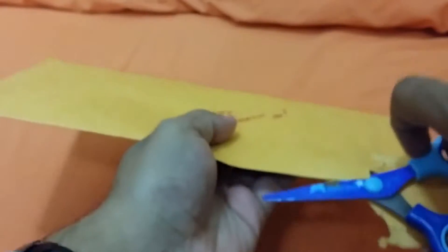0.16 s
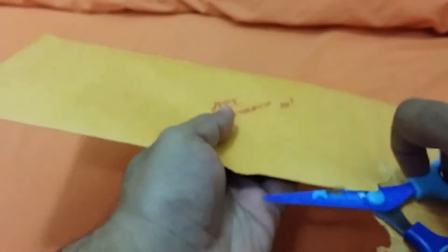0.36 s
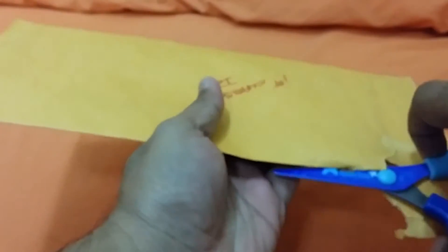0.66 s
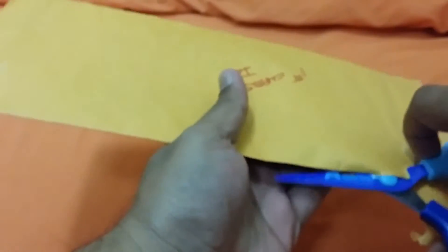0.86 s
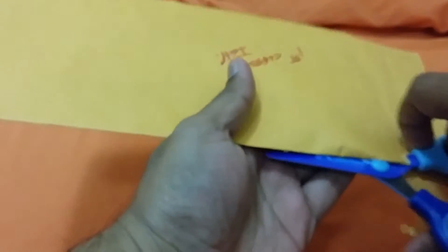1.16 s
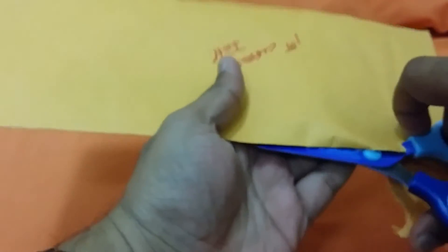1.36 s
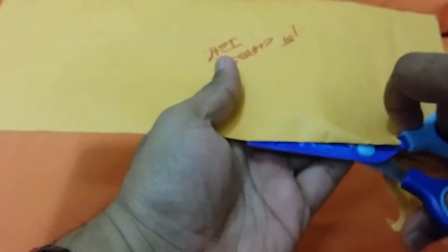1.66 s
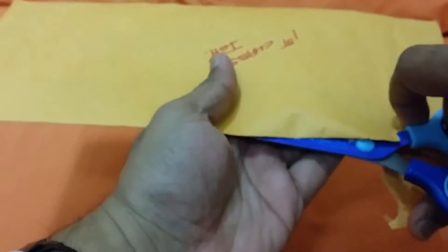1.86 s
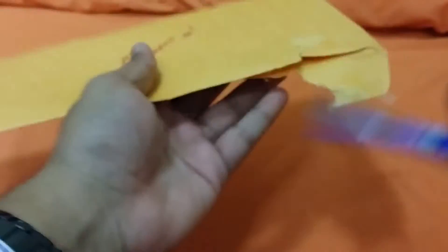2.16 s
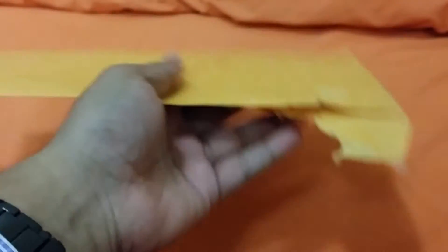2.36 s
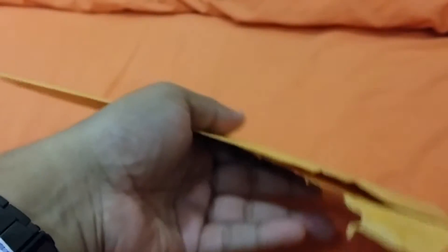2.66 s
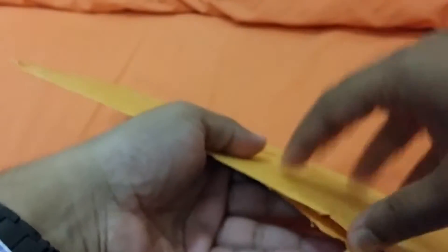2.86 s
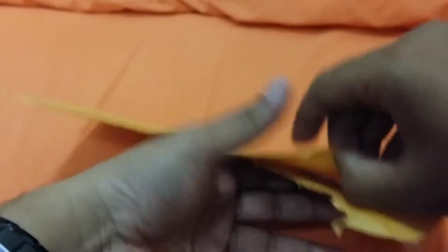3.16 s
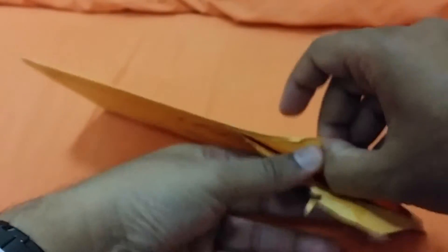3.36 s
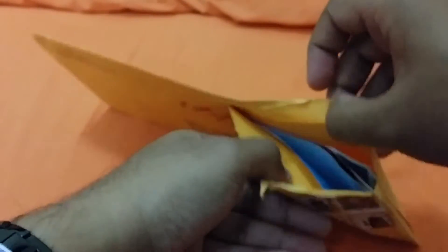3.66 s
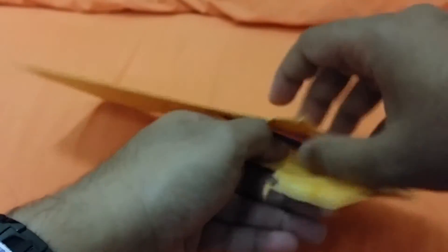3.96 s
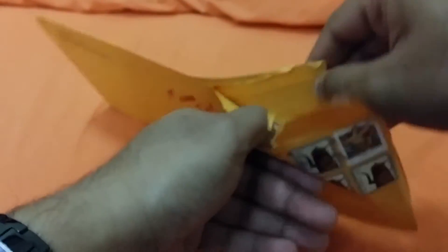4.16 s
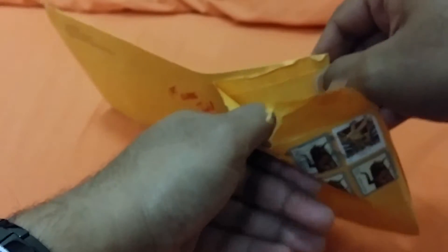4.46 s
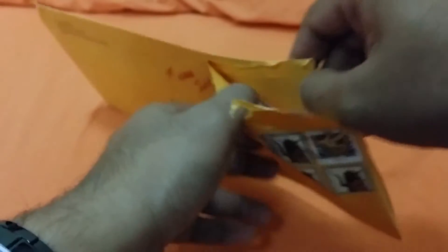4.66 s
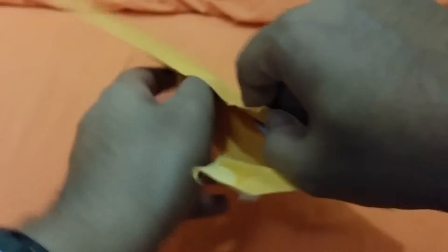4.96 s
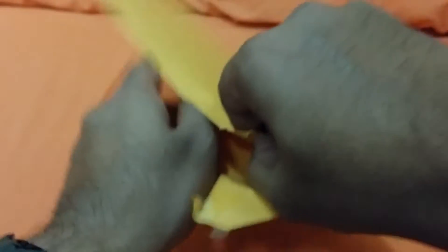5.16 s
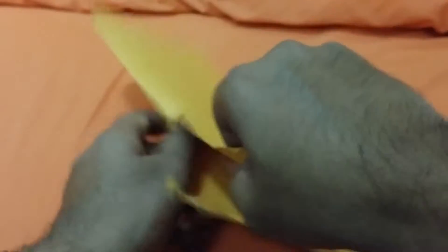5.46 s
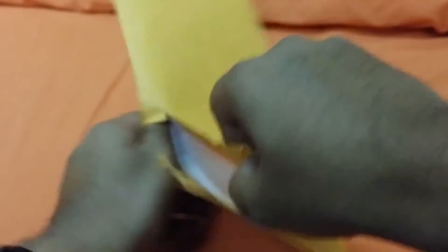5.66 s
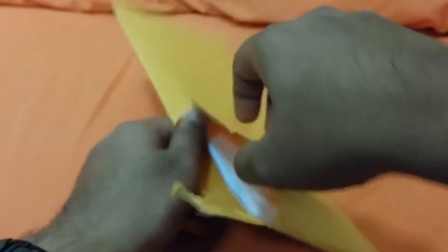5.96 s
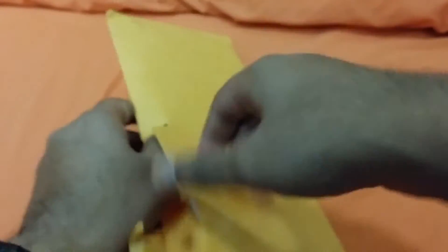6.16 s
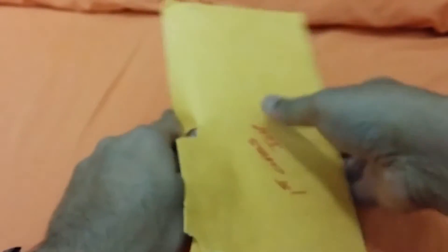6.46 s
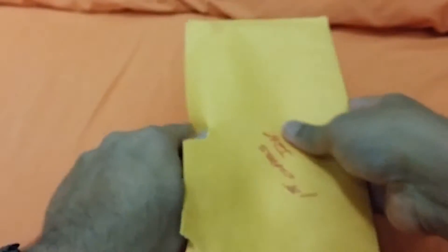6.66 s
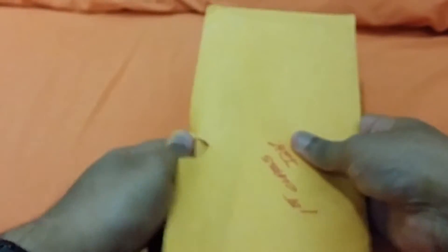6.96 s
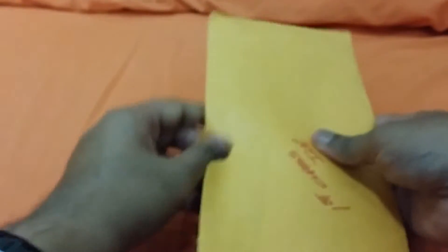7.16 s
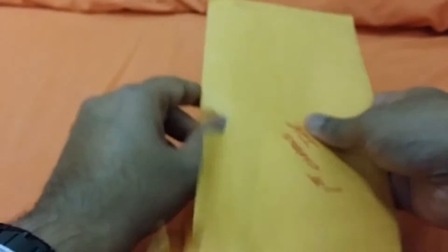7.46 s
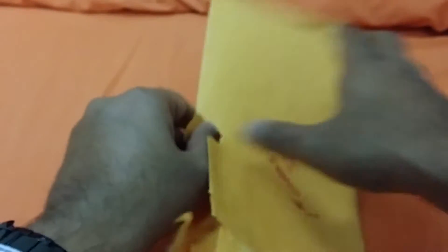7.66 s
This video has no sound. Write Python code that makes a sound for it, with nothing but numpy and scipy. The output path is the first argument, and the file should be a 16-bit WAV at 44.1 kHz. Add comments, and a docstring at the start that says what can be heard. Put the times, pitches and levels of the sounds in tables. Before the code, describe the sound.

Close to the microphone in a small soft bedroom, scissors work through a paper envelope in short, low-level gritty strokes, ending with a brisk scrape. A soft thud on bedding and a near-quiet gap follow. Then fingers prise the paper open with sharp snaps, two quick rips, crumpling and a very loud pop, over faint hiss and hum.

```python
"""Paper envelope cut and torn open

Scissors work along the edge of an envelope and are dropped on a bed; then fingers prise, tear and crumple
the paper close to a two-port microphone. Fibres crackle as shaped noise grit, creases snap as clusters of
ticks with short rings, the sheet flaps as two damped modes, and bumps on the bedding are low noise pushes.
A small soft room of random taps answers, over steady hiss and a wavering mains hum."""
import sys
import numpy as np
from scipy import signal
from scipy.fft import rfft, irfft
from scipy.io import wavfile
from scipy.ndimage import uniform_filter1d

SR = 44100
rng = np.random.default_rng(int(sys.argv[2]) if len(sys.argv) > 2 else 0)


def generate_wav(sig):
    """Save sig (samples, or channels by samples) to the path in sys.argv[1] as 16-bit PCM at SR."""
    pcm = np.round(np.clip(np.atleast_2d(sig).T, -1, 1) * 32767).astype(np.int16)
    wavfile.write(sys.argv[1], SR, pcm)


N = 343980

# Spectrum of tearing paper fibre. Each row: frequency in Hz, relative density in dB per Hz.
FIBRE_SPECTRUM = [(35, -27), (60, -2.5), (164, 1.5), (512, -10), (827, 0), (1250, -5.5), (1970, -2),
                  (5370, -0.5), (14000, -9.5)]
CUT_END_S = 1.88  # the scissors have stopped cutting


def crackle():
    """Tearing fibres: fine uneven grit in clumps, tilted by brightness, following the effort."""
    grains_per_s = 3000
    struck = rng.random(N) < grains_per_s / SR
    sizes = gain_of(7.2 * np.minimum(rng.exponential(1, N), 3)) * struck
    clumps = gain_of(1.13 * drift(0.0041))
    grain = (evened(sizes) + 1.07) * clumps * rng.standard_normal((2, N))
    flat = [(1, 0)]
    hz, t, z = signal.stft(paired(grain, 4.9, flat), SR, nperseg=512, noverlap=384)
    hz = hz[:, None]
    db, tilt = effort(t)
    tilt_db = np.log2(hz / 3000 + 0.02) * tilt
    shape = gain_of(read(FIBRE_SPECTRUM, hz) + tilt_db + ringing(hz, t))
    # The effort sets the level of the part above 900 Hz; the sheet's boom grows more slowly.
    shape /= np.sqrt((shape[hz[:, 0] > 900] ** 2).mean(0))
    shape *= gain_of(-.3 * (db + 39) / (1 + (hz / 500) ** 2))
    # The rubbed spot changes: smooth random patches over frequency and time.
    patches = uniform_filter1d(rng.standard_normal(shape.shape), 10, 0)
    patches = uniform_filter1d(patches, 8, 1)
    z = z * shape * gain_of(3.6 * evened(patches))
    x = signal.istft(z, SR, nperseg=512, noverlap=384)[1][:, :N]
    level_db = effort(np.arange(N) / SR)[0]
    return x * gain_of(level_db) / grain.std()


def crumple():
    """Small creases at random moments, stronger when the handling is dull and broad."""
    creases_per_s = 140
    t, pitches = np.arange(N) / SR, np.geomspace(900, 2800, num=10)
    db, tilt = effort(t)
    force_db = 0.87 * db - 2.4 * tilt - 6.0
    force_db -= 4.1 * (t < CUT_END_S)  # the sheet is held flat while it is cut
    spread_db = 3.46 * np.minimum(rng.exponential(1, N), 3)
    sizes = gain_of(force_db + spread_db) * (rng.random(N) < creases_per_s / SR)
    which = rng.integers(0, len(pitches), N)
    grit = rng.standard_normal((len(pitches), 3, 2048))
    out = np.zeros((2, N))
    for k, hz in enumerate(pitches):
        strikes = (sizes * (which == k))[None]
        out += signal.oaconvolve(strikes, crease(hz, -13.0, -4.0, grit[k]), axes=1)[:, :N]
    return out


def snaps():
    """The loud creases, one by one; strong, low snaps make the whole sheet flap more."""
    # Creases buckling. Each row: time in seconds, level in dB before room and microphone,
    # pitch of the buckling patch in Hz.
    snap_rows = [(0.238, -42, 970), (0.558, -46.5, 835), (1.134, -34.5, 1150), (1.374, -42.5, 880),
                 (1.468, -40.5, 880), (1.54, -42, 410), (2.339, -38.5, 9000), (2.428, -41.5, 9000),
                 (2.778, -44.5, 5360), (2.926, -26.5, 2250), (3.349, -37.5, 2100), (3.372, -34.5, 2610),
                 (3.423, -8.5, 2470), (3.539, -14.5, 1890), (3.558, -17, 1800), (3.972, -20, 2010),
                 (4.112, -22, 2570), (4.148, -36.5, 895), (4.261, -36, 8000), (4.521, -36.5, 906),
                 (4.663, -25.5, 1730), (4.862, -23.5, 1650), (4.988, -27.5, 1050), (5.117, -30.5, 1000),
                 (5.215, -10, 4460), (5.228, -17, 4080), (5.265, -12, 3700), (5.267, -16, 970),
                 (5.277, -19, 2680), (5.513, -36, 890), (5.543, -30.5, 890), (5.565, -19, 2700),
                 (5.576, -13, 4200), (5.606, -13.5, 4540), (5.639, -9.5, 4030), (5.662, -11.5, 1740),
                 (5.794, -27.5, 996), (5.961, -26, 1480), (5.975, -29, 2400), (6.103, -26, 2350),
                 (6.147, -22, 950), (6.198, -14, 1140), (6.212, -23.5, 1400), (6.407, -29, 1080),
                 (6.43, -23.5, 900), (6.441, -28, 1410), (6.456, -26.5, 880), (6.487, -27.5, 915),
                 (6.494, -30, 1880), (6.51, -29.5, 1800), (6.537, -21.5, 2300), (6.546, -17.5, 2030),
                 (6.578, -23.5, 905), (6.689, -1, 2940), (6.762, -9.5, 970), (6.799, -17.5, 8000),
                 (7.02, -17, 1410), (7.025, -15.5, 1740), (7.093, -31, 1500), (7.122, -31, 2300),
                 (7.142, -17.5, 2460), (7.271, -11, 1045), (7.489, -26, 940), (7.517, -29, 2700),
                 (7.541, -24.5, 955), (7.559, -24.5, 960), (7.623, -31.5, 794), (7.646, -36.5, 1510),
                 (7.671, -32.5, 865)]
    dulling = 0.24  # treble lost (dB) for each dB that a snap is weaker
    base_flap_db, flap_per_db, flap_per_octave = -20, 0.94, -6.5
    out = np.zeros((2, N))
    for (s, db, hz), grit in zip(snap_rows, rng.standard_normal((len(snap_rows), 3, 2048))):
        flap_db = base_flap_db + flap_per_db * db + flap_per_octave * np.log2(hz / 1000)
        sound = crease(hz, flap_db - db, dulling * db, grit)
        add(out, s - .0007, gain_of(db) * sound)
    return out


def crease(hz, flap_db, treble_db, grit):
    """A cluster of ticks lasting some ms, a short ring at the patch's pitch (together peak 1), and a flap."""
    # Modes of the sheet. Each row: frequency in Hz, relative level in dB, 60 dB decay time in seconds.
    sheet_modes = [(218, -8, 0.054), (323.5, 5, 0.014)]
    t = np.arange(grit.shape[1]) / SR
    push = t * np.exp(-t / 0.00049)
    flap = sum(gain_of(d) * ring(push, f, t60) for f, d, t60 in sheet_modes)
    envelope = t ** 2 * np.exp(-t / 0.00091 * (hz / 1500) ** 0.25)  # higher patches give way faster
    ticks = grit[:2] * gain_of(4.4 * grit[2]) * envelope
    colour = [(hz / 69.0, -28.0), (hz, 0), (hz * 3.03, treble_db - 3.0), (hz * 13.5, treble_db - 33.5)]
    lag = 3 + 2.03 * grit[0, 0]  # samples; each crease sits elsewhere between the ports
    ticks = paired(ticks, lag, colour)
    snap = ticks / abs(ticks).max() + 0.42 * ring(ticks, hz, 10 / hz)
    return snap / abs(snap.mean(0)).max() + gain_of(flap_db) * flap


def slips():
    """The cut jams and lets go: gritty noise bursts that swell for 2.5 ms and then die away."""
    # Blade slips. Each row: time in seconds, peak level in dB before room and microphone.
    slip_rows = [(0.4, -29), (0.432, -32.5), (0.472, -34), (0.482, -40), (0.492, -30), (0.519, -36),
                 (0.6956, -33.5), (0.837, -28.5), (0.872, -23.5), (0.9167, -23.5), (0.9428, -32),
                 (1.285, -30), (1.6345, -25), (1.6612, -23.5), (1.68, -22.5), (1.724, -25), (1.76, -30),
                 (1.7771, -22.5), (1.833, -32)]
    out = np.zeros((2, N))
    u = np.arange(1024) / SR / 0.0025
    for (s, db), grit in zip(slip_rows, rng.standard_normal((len(slip_rows), 3, len(u)))):
        rough = grit[:2] * gain_of(3.16 * grit[2])
        burst = paired(rough * u * np.exp(-u), 0.28, FIBRE_SPECTRUM)
        add(out, s - .001, gain_of(db) * burst / abs(burst).max())
    return out


def effort(t):
    """How hard the paper is worked (dB) and its tilt: every stroke rises, holds and falls; powers add."""
    # Scissor strokes along the edge. Each row: time when full in seconds, held time in seconds, level in dB.
    cuts = [(0.0, 0.064, -53), (0.384, 0.029, -47.5), (0.457, 0.032, -47), (0.668, 0.051, -45),
            (0.839, 0.049, -46), (0.915, 0.018, -47.5), (1.082, 0.054, -45), (1.216, 0.022, -52.5),
            (1.263, 0.054, -41.5), (1.459, 0.011, -53.5), (1.602, 0.029, -44.5), (1.68, 0.039, -43.5),
            (1.76, 0.04, -46)]
    cut_tilt, cut_rise, cut_fall = 0.92, 1000, 544  # dB per octave, dB per s, dB per s
    # Blades or fingers sliding over the paper. Each row: time when full in seconds, level in dB,
    # tilt in dB per octave.
    rubs = [(1.956, -31, 2.5), (3.039, -50, 5.), (3.428, -46, -1), (3.788, -48, 4.5), (4.007, -44.5, -1),
            (4.15, -53, -0.5), (4.663, -47, -0.8), (5.143, -45, -0.5), (6.072, -44.5, 2.5),
            (6.203, -42, -1.5), (6.416, -47, -2), (6.995, -38.5, 3), (7.134, -41.5, -2), (7.272, -32, 1),
            (7.405, -34.5, 0.5), (7.536, -41, -1.5), (7.665, -45, -2)]
    rub_held_s, rub_rise, rub_fall = 0.0051, 385, 328  # rise and fall in dB per s
    # Rips that start suddenly and run out. Each row: time when full in seconds, held time in seconds,
    # level in dB, tilt in dB per octave, dying in dB per second.
    tears = [(5.218, 0.052, -27, 0.55, 336), (5.565, 0.022, -34, -2, 448), (5.606, 0.057, -26.5, 0.14, 103),
             (6.686, 0.0089, -27, 0.27, 79)]
    tear_rise = 2200  # dB per s
    # Slow rustle of the envelope being held and turned. Each row: time in seconds, level in dB,
    # tilt in dB per octave.
    grip_rows = [(0.0, -70.5, 2), (1.0, -64, -1), (1.85, -62, .4), (2.1, -81, 20), (2.431, -58.5, 1),
                 (2.53, -75.5, 13), (2.85, -61.5, 2.5), (3.26, -67.5, 3.5), (3.47, -50.5, 0),
                 (3.721, -60.5, 0.5), (4.3, -81, 0.8), (4.66, -53.5, 3), (5.1, -51, -0.5), (5.2, -82, -.3),
                 (5.3, -37.5, 0.3), (5.53, -53, -2.5), (5.9, -46.5, -2), (6.36, -55.5, 0),
                 (6.46, -50.5, -2.5), (6.65, -39.5, 0), (7.1, -55.5, -4.5), (7.8, -50, 1.9)]

    strokes = [(*cut, cut_tilt, cut_fall, cut_rise) for cut in cuts]
    strokes += [(s, rub_held_s, db, tilt, rub_fall, rub_rise) for s, db, tilt in rubs]
    strokes += [(*tear, tear_rise) for tear in tears]
    s, held, db, tilt, fall, rise = np.array(strokes).T[:, :, None]
    grid = np.arange(0, N / SR + 1, 1 / 1000)  # seconds, in steps of 1 ms
    rising_db = rise * np.maximum(s - grid, 0)
    falling_db = fall * np.maximum(grid - s - abs(held), 0)
    power = gain_of(2 * (db - rising_db - falling_db))
    grip_s, grip_db, grip_tilt = np.transpose(grip_rows)
    grip = gain_of(2 * np.interp(grid, grip_s, grip_db))
    total = power.sum(0) + grip
    # The loudest handling weighs most in the brightness.
    mean_tilt = ((power * tilt).sum(0) + grip * np.interp(grid, grip_s, grip_tilt)) / total
    return np.interp(t, grid, 10 * np.log10(total)), np.interp(t, grid, mean_tilt)


def ringing(hz, t):
    """Colour (dB) added by what rings along at time t: a resonance bump over frequency."""
    # First the blades in the cut, then the opened pocket. Each row: start in seconds, end in seconds,
    # centre in Hz, width in Hz, boost in dB.
    resonances = [(0, CUT_END_S, 3470, 500, 6), (3.3, 4.8, 2050, 1000, 6.5)]
    colour_db = 0
    for start, end, f, width, db in resonances:
        bump = db / (1 + (2 * (hz - f) / width) ** 2)
        colour_db = colour_db + bump * (t > start) * (t < end)
    return colour_db


def bumps():
    """Hands and scissors on the bedding: soft uneven noise pushes around a low pitch."""
    # Dull bumps. Each row: time in seconds, peak level in dB before the microphone, pitch in Hz.
    bump_rows = [(1.829, -35.5, 107), (2.333, -41.5, 133), (2.45, -32.5, 131.6), (5.922, -40, 88.5),
                 (6.416, -30.5, 240), (6.534, -31, 159), (6.695, -15.5, 291), (6.769, -25.5, 320)]
    out = np.zeros((2, N))
    t = np.arange(8192) / SR
    for (s, db, hz), noise in zip(bump_rows, rng.standard_normal((len(bump_rows), 2, len(t)))):
        colour = [(hz / 4.8, -22.0), (hz, 0), (hz * 2, -14.0), (hz * 30, -55.0)]
        push = paired(noise * t * np.exp(-t * hz / 2.25), 0, colour)
        add(out, s - 1 / hz, gain_of(db) * push / abs(push).max())
    return out


def room(x):
    """Sparse taps of random sign, other for each port, bands dying at their own speed; two tails take turns."""
    # Decay of the small soft room. Each row: frequency in Hz, 60 dB decay time in seconds.
    decay = [(300, 0.62), (10000, 0.37)]
    taps = rng.choice([-1., 1.], (2, 2, SR // 2)) * (rng.random((2, 2, SR // 2)) < .1)
    taps[..., :150] = 0  # no echo in the first 3.4 ms
    hz, t, z = signal.stft(taps, SR, nperseg=128)
    t60 = np.maximum(read(decay, hz), .05)[:, None]
    tails = signal.istft(z * gain_of(-60 * t / t60), SR, nperseg=128)[1]
    tails /= np.linalg.norm(tails, axis=2, keepdims=True)
    turn = 2 * np.pi * 7.0 * np.arange(N) / SR
    wet = np.zeros((2, N))
    for weight, tail in zip((np.sin(turn), np.cos(turn)), tails):
        wet += signal.fftconvolve(x * weight, tail, axes=1)[:, :N]
    return signal.lfilter(*signal.butter(1, 500, "high", fs=SR), wet)


def background():
    """Steady coloured hiss and a mains hum of two sines, wavering in level and phase."""
    # Hiss spectrum. Each row: frequency in Hz, relative density in dB per Hz.
    hiss_spectrum = [(25, -8), (44, -18), (107, -5.5), (151, -7), (684, -25.5), (4140, -32.5), (6500, -16),
                     (8470, -35), (14000, -36)]
    hiss_db = -67  # rms before the microphone
    hum_hz, hum_db = 102, -63.5  # second harmonic of the mains; peak dB before wavering
    hiss = gain_of(hiss_db) * evened(paired(rng.standard_normal((2, N)), 0, hiss_spectrum))
    t = np.arange(N) / SR
    waver_db = 3.0 * drift(.04)
    wander = 1.2 * np.array([drift(.05), drift(.05)])  # phase in radians, own for each port
    hum = gain_of(hum_db + waver_db) * np.sin(2 * np.pi * hum_hz * t + wander)
    fundamental = gain_of(hum_db - 5.0) * np.sin(np.pi * hum_hz * t + drift(0.25))
    return hiss + hum + fundamental


def paired(x, lag, colour):
    """Ports hear x[0] alike in the bass, the right more of its own x[1] in the treble, lag samples late."""
    # Likeness of the two ports. Each row: frequency in Hz, left-right likeness from 0 to 1.
    likeness = [(60, 0.99), (200, 0.81), (1500, 0.78), (5000, 0.29)]
    hz, z = np.fft.rfftfreq(x.shape[1], 1 / SR), rfft(x)
    same = np.clip(read(likeness, hz), 0, 1)
    right = same * z[0] + np.sqrt(1 - same ** 2) * z[1]
    right = right * np.exp(-2j * np.pi * hz * lag / SR)
    return irfft(np.array([z[0], right]) * gain_of(read(colour, hz)), x.shape[1])


def ring(x, hz, t60):
    """One damped mode struck by x, peak 1."""
    r = 10 ** (-3 / (max(t60, 1e-4) * SR))
    y = signal.lfilter([1, -1], [1, -2 * r * np.cos(2 * np.pi * hz / SR), r * r], x)
    return y / abs(y).max()


def drift(seconds):
    """Slow chance of rms 1: noise smoothed twice over the given time."""
    size = max(round(seconds * SR), 2)
    smooth = uniform_filter1d(rng.standard_normal(N), size)
    return evened(uniform_filter1d(smooth, size))


def gain_of(db):
    """Decibels to a factor."""
    return 10 ** (np.asarray(db) / 20)


def evened(x):
    """Scales to rms 1."""
    return x / np.sqrt(np.mean(x ** 2) + 1e-20)


def read(points, hz):
    """A spectrum table read on a log-frequency axis."""
    f, value = np.transpose(points)
    return np.interp(np.log(hz + 1), np.log(f + 1), value)


def add(mix, s, sound):
    """Mixes a sound in at time s in seconds."""
    part = mix[..., round(s * SR):][..., :sound.shape[-1]]
    part += sound[..., :part.shape[-1]]


def scene():
    """Near paper sounds, their echo, the bumps on the bed and the steady background."""
    near = crackle() + crumple() + slips() + snaps()
    return near + gain_of(-14.0) * room(near) + bumps() + background()


def record(dry):
    """Two ports colour the sound; the top above 14.2 kHz is dimmed; loud peaks are rounded; band limit."""
    # Difference between the ports. Each row: frequency in Hz, left minus right in dB.
    port_balance = [(60, 1.5), (700, 0), (4400, 3), (8000, 2), (13000, -0.5)]
    # Upper limit of the sound. Each row: frequency in Hz, gain in dB.
    top_gain = [(14200, 0), (15000, -19)]
    edge_hz = 15800
    hz = np.fft.rfftfreq(N, 1 / SR)
    port_db = read(port_balance, hz) * np.array([[.5], [-.5]])
    ported = irfft(rfft(dry) * gain_of(port_db + read(top_gain, hz)), N)
    band_limit = signal.firwin(801, edge_hz, window=("kaiser", 10), fs=SR)
    return signal.oaconvolve(np.tanh(ported), band_limit[None], "same")


dry = scene()
out = record(dry)
generate_wav(out)
```